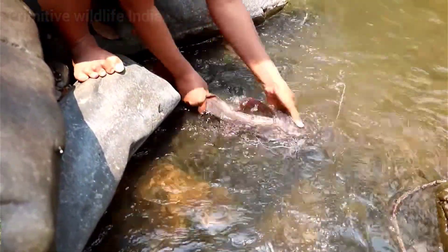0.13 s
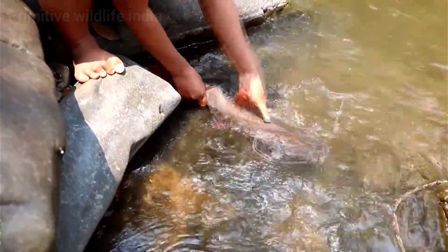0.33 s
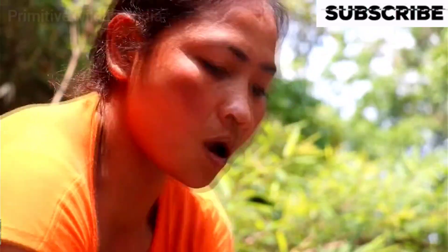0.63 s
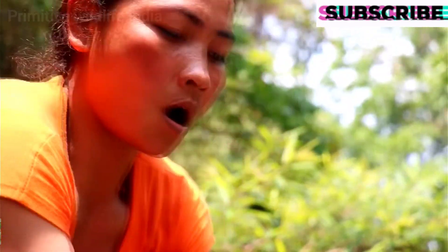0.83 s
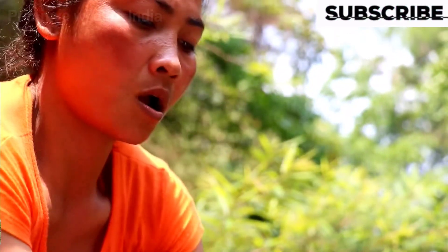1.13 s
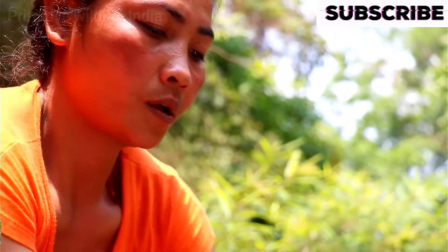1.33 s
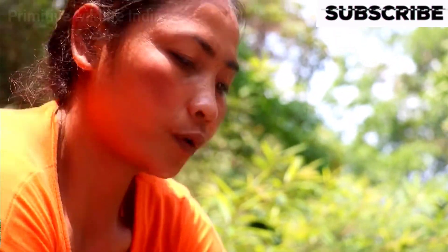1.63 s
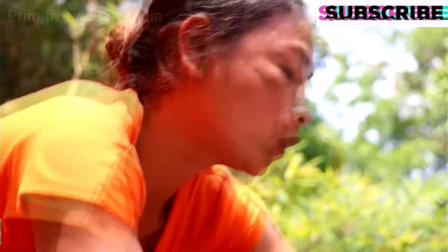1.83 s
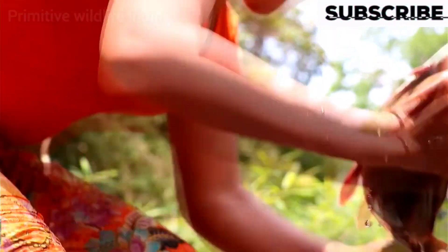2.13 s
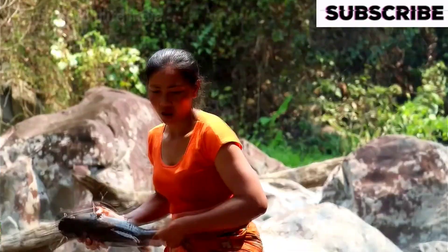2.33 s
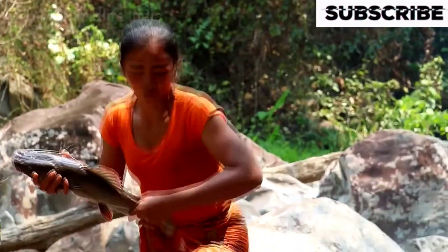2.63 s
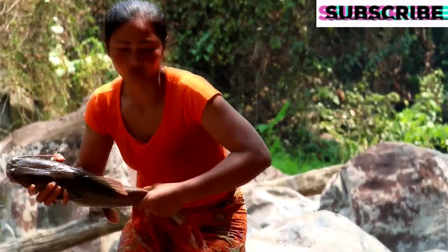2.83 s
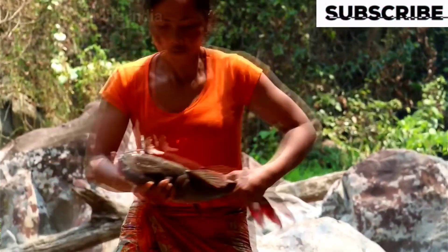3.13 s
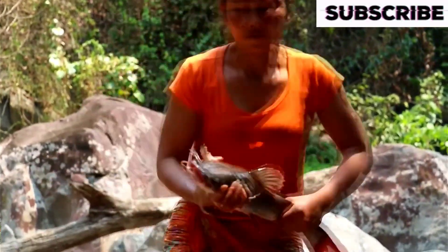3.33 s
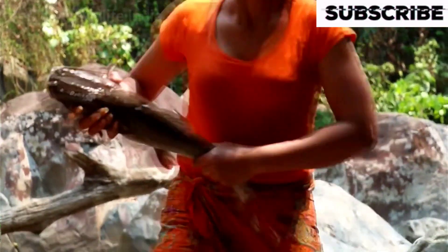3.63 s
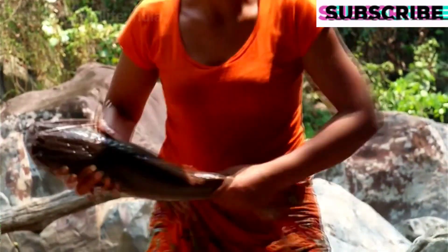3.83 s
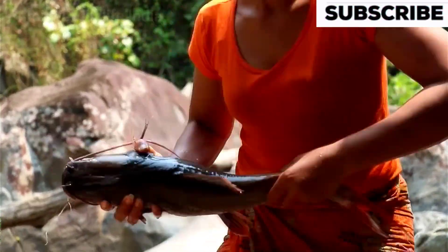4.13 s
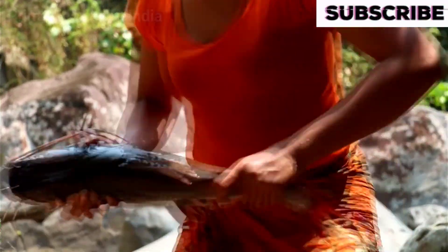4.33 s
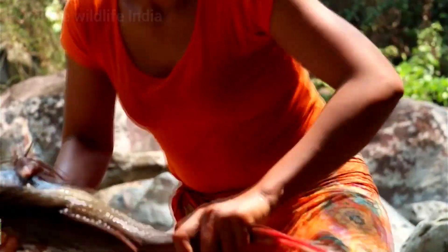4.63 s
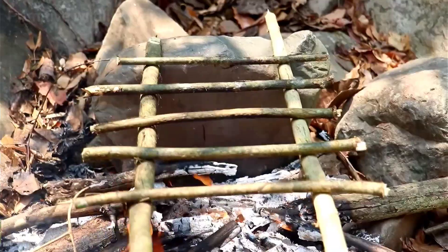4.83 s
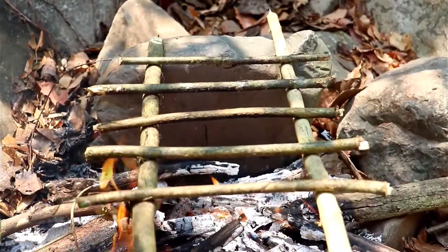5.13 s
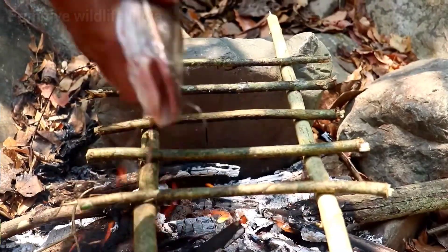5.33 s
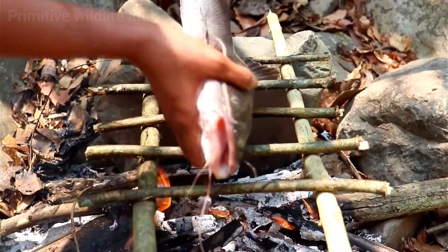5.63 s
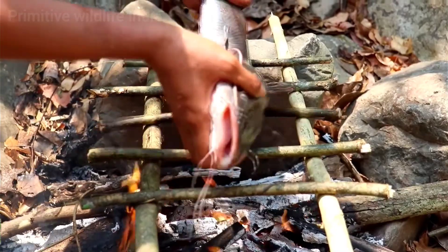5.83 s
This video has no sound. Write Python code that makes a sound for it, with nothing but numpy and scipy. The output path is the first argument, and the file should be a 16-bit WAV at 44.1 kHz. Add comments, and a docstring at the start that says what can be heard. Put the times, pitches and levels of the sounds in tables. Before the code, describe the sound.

Hands slosh a fish in shallow water, then close tinny dripping gives way to a thin distant river hiss with light rustles.

```python
"""A shallow rocky river, heard in four short stretches over a faint hush.
First, hands slosh a fish through the water: slaps, spray and resonating air bubbles, with faint birds.
From 0.5 s water trickles and drips with a tinny ring near 3 kHz.
From 2.1 s the river is farther off, its countless splashes merged into a thin hiss. Handling rustles
over it, one knock sounds at 3 s, and faint high bird whistles return toward the end."""
import sys
import numpy as np
from scipy import signal
from scipy.fft import rfft, irfft
from scipy.io import wavfile
from scipy.ndimage import uniform_filter1d

SR = 44100
rng = np.random.default_rng(int(sys.argv[2]) if len(sys.argv) > 2 else 0)


def bounce(signal):
    """Save signal as a 16-bit WAV file at the path given by the first command-line argument."""
    frames = np.transpose(np.atleast_2d(signal))
    limited = np.clip(frames, -1, 1)
    pcm = np.round(limited * 32767).astype(np.int16)
    wavfile.write(sys.argv[1], SR, pcm)


N = 263277
TIME = np.arange(N) / SR

# stretches of the scene: start_s, end_s
STRETCHES = [(0, .4795), (.502, 2.063), (2.097, 4.506), (4.552, 6)]
# spectral envelopes of the sources: frequency_hz, relative_db
HUSH_SPECTRUM = [(25, 17.5), (60, 1), (150, -3), (240, 1.5), (400, -1), (1000, 4), (2500, 3), (6000, 0.5),
                 (9000, 0), (12000, -31), (16000, -38)]
RIVER_SPECTRUM = [(400, -45.5), (950, -31.5), (1400, -18.5), (1750, -14), (2400, -7.5), (2800, -1),
                  (3200, 0), (3650, -6.5), (5300, -13), (6400, -13), (8000, -21.5), (9600, -16.5),
                  (12500, -31), (15800, -32)]
RUSTLE_SPECTRUM = [(600, -43), (1300, -19), (2000, -11), (2400, -4), (2750, 5), (3300, 3), (3800, -5.5),
                   (4400, -5.5), (6300, -13.5), (8500, -18.5), (12000, -27), (15800, -36)]
KNOCK_SPECTRUM = [(150, -39), (350, -18), (600, 1.5), (1200, 5), (2000, 0), (3000, 9), (4200, -8),
                  (8000, -26), (15000, -38)]
SLOSH_SPECTRUM = [(50, -17), (110, -12.5), (200, -3), (320, -13.5), (440, -3), (600, -5), (880, -2),
                  (1500, -6.5), (2300, -13), (4200, -13), (6000, -20.5), (7800, -25.5), (9500, -23),
                  (15500, -40)]
TRICKLE_SPECTRUM = [(300, -36.5), (700, -22), (1100, -20), (1800, -13), (2400, -8.5), (2850, 5),
                    (3250, 0.5), (3800, -10.5), (4900, -15), (6200, -21), (7800, -24), (10000, -21),
                    (12500, -34), (15800, -45)]
DROP_SPECTRUM = [(400, -36), (1100, -24.5), (1800, -8.5), (2400, -10.5), (2900, 7.5), (3400, 3),
                 (3900, -4.5), (4900, -10.5), (6200, -16.5), (8000, -29), (11000, -32.5), (15800, -42)]
# bird whistles: start_s, length_s, start_hz, end_hz, level_db
BIRD_WHISTLES = [(0.048, 0.055, 4370, 4770, -42), (.174, .11, 7930, 5970, -46.5),
                 (0.258, 0.14, 6340, 4820, -38.5), (0.416, 0.3, 7400, 7150, -53),
                 (1.952, .19, 8000, 8000, -57), (3.415, .04, 4900, 5400, -41),
                 (5.205, 0.49, 7220, 7400, -54), (5.696, 0.1, 7500, 8050, -44)]
# the river's hiss in the second, third and fourth stretch: relative_db
HISS_LEVELS = [-36, -38.5, -38]
# narrow-band swells of the hiss: start_s, length_s, relative_db, centre_hz
HISS_SWELLS = [(2.24, .36, -34.5, 3125), (3.098, 0.2, -43.5, 3320), (4.839, 0.32, -38.5, 2997),
               (5.512, 0.038, -35.5, 3320), (5.762, 0.1, -38, 3400)]
# rustles of hands, cloth and leaves: start_s, length_s, level_db, tilt_db_per_octave
HANDLING_RUSTLES = [(2.708, 0.032, -25, 1), (2.999, 0.017, -26.5, -3.5), (3.413, 0.044, -31.5, -3),
                    (3.457, 0.19, -42.5, -8), (3.765, 0.0074, -28.5, -3), (3.782, 0.059, -34, 6),
                    (3.86, 0.18, -34.5, 3.5), (4.026, 0.072, -32.5, 1), (4.193, 0.022, -36, 12.5),
                    (4.283, .14, -40, 0), (4.401, 0.013, -34.5, -3.5), (4.806, .014, -33, -2),
                    (4.877, 0.43, -35.5, 3), (5.448, 0.2, -46.5, 11)]
# one sharp knock and its duller rebounds: start_s, level_db, tilt_db_per_octave
KNOCK_IMPACTS = [(3.0349, -22, 0), (3.037, -28, -3), (3.0505, -38, -9)]
# how hard the hands stir the water: time_s, level_db
STIR_CURVE = [(0, -32.5), (.146, -30.5), (.2, -33.5), (.47, -27)]
# slaps of hands and fish on the water: start_s, peak_db, tilt_db_per_octave
WATER_SLAPS = [(.089, -38, 7), (0.106, -36, 7), (0.16, -26.5, 0.5), (0.2567, -27.5, 0.5), (0.301, -23.5, 2),
               (0.343, -25, 2), (0.451, -29.5, 5.5), (0.4767, -20.5, -3)]
# flow of the trickle, thinning and picking up again: time_s, level_db
FLOW_CURVE = [(.5, -27.5), (.7, -27), (.82, -34), (1.17, -27), (1.28, -32.5), (1.48, -28.5), (1.6, -31),
              (1.84, -37.5), (2.05, -29)]
# distinct bubbles, from low plops to small high pings: start_s, level_db, pitch_hz, rise_octaves_per_s
SINGLE_BUBBLES = [(.038, -11, 474, -3), (.064, -15, 710, -1), (.095, -21.5, 830, 14), (.128, -18, 850, 13),
                  (.146, -14.5, 887, 2), (.204, -22, 4540, 3), (.252, -22, 1350, 7), (0.2557, -21, 4680, 0),
                  (.344, -19, 640, 7), (.362, -17, 694, 2), (.382, -18.5, 452, 2), (0.426, -17, 1090, 6),
                  (.443, -13.5, 393, -4.5), (.548, -31, 640, -2), (1.07, -31, 728, 0.5),
                  (1.161, -11, 4540, 13), (1.299, -15.5, 4930, 1), (1.322, -11, 4880, -2),
                  (1.327, -36.5, 450, 31), (1.336, -29.5, 1045, 26), (1.439, -14.5, 4610, 8),
                  (1.456, -25.5, 1354, 19), (1.523, -16, 4400, 10), (1.541, -15.5, 4000, 13),
                  (1.464, -21, 2090, 24), (1.631, -27, 1690, -14), (1.938, -38, 730, 7),
                  (1.958, -34, 1110, 23)]
# heavy drops striking the water: start_s, peak_db, ring_t60_s, tilt_db_per_octave
HEAVY_DROPS = [(0.506, -27, .011, -4), (.5166, -18.5, .009, -9), (.5651, -18.5, 0.008, -6),
               (.571, -20, 0.0027, 5), (.756, -19, .008, -1), (0.8422, -19.5, 0.017, 2.5),
               (0.8763, -13, .016, -3), (0.9353, -16.5, 0.03, 4.5), (0.9766, -10.5, 0.0091, 5.5),
               (.98, -11, 0.02, 0.5), (1.032, -23.5, 0.013, 3), (1.1567, -10, 0.009, 10),
               (1.2421, -9, 0.0076, 5), (1.29, -21, 0.0095, 7), (1.32, -15.5, 0.0034, 11.5),
               (1.3574, -17.5, 0.0049, 4), (1.439, -12.5, 0.0057, 4), (1.47, -27, .0095, -4),
               (1.524, -18.5, 0.02, 7.5), (1.542, -16.5, 0.019, 2.5), (1.6811, -18.5, 0.0061, -3.5),
               (2.059, -24, .008, 5.5)]


def amp(db):
    """Amplitude ratio of a level in decibels."""
    return 10 ** (np.asarray(db) / 20)


def unit(x):
    """Normalisation to rms 1."""
    return x / np.sqrt(np.mean(x ** 2) + 1e-20)


def crest(x):
    """Normalisation of the loudest 3 ms to rms 1."""
    return x / np.sqrt(uniform_filter1d(x ** 2, size=132, mode="constant").max() + 1e-20)


def level(curve):
    """Amplitude envelope interpolated from rows of time_s, level_db."""
    return amp(np.interp(TIME, *np.transpose(curve)))


def gate(index):
    """Time window of one stretch, with 2 ms edges."""
    start, end = STRETCHES[index]
    return uniform_filter1d(1. * ((TIME >= start) & (TIME < end)), size=90)


def add(mix, start_s, sound):
    """Superposition: a sound adds to the mix from start_s on."""
    part = mix[max(round(start_s * SR), 0):][:len(sound)]
    part += sound[:len(part)]


def colour(x, spectrum, tilt_db=0, size=2048):
    """Minimum-phase filtering by a spectral envelope, tilted by tilt_db per octave up to 8 kHz."""
    octave = np.log2(abs(np.fft.fftfreq(size, 1 / SR)) + 1)
    hz, db = np.transpose(spectrum)
    db = np.interp(octave, np.log2(hz), db) + tilt_db * np.minimum(octave, np.log2(8000))
    db -= 12 * np.maximum(np.log2(hz[0]) - octave, 0)  # the bass falls away below the first point
    log_gain = np.log(amp(np.maximum(db - db.max(), -90)))
    taps = np.fft.ifft(np.exp(np.conj(signal.hilbert(log_gain)))).real
    return signal.fftconvolve(x, taps[:size // 2])[:len(x)]


def wander(count, rate_hz):
    """Low-pass Gaussian noise: a smooth random fluctuation of rms 1."""
    lowpass = np.exp(-(np.fft.rfftfreq(count, 1 / SR) / rate_hz) ** 2)
    return unit(irfft(rfft(rng.standard_normal(count)) * lowpass, count))


def patchy_noise(depth_db, size=512):
    """Noise whose narrow bands swell and sink under random amplitude modulation."""
    bands = signal.stft(rng.standard_normal(N), nperseg=size)[2]
    field = uniform_filter1d(rng.standard_normal(bands.shape), size=4, axis=0)
    field = uniform_filter1d(field, size=6, axis=1)
    return signal.istft(bands * amp(depth_db * unit(field)), nperseg=size)[1][:N]


def blurred_tone(length_s, start_hz, end_hz, width_hz):
    """Random modulation spreads a gliding tone into a narrow band."""
    count = int(length_s * SR)
    blur = wander(count, width_hz / 2) + 1j * wander(count, width_hz / 2)
    phase = 2 * np.pi * np.cumsum(np.geomspace(start_hz, end_hz, count)) / SR
    return (blur * np.exp(1j * phase)).real * signal.windows.tukey(count, .5)


def patter(per_s, spread_db):
    """A Poisson process of clicks, most small and a few large."""
    size = amp(spread_db * np.minimum(rng.exponential(1, N), 3.5))
    return size * rng.choice([-1, 1], N) * (rng.random(N) < per_s / SR)


def ring(hz, t60_s, octaves_per_s):
    """A damped oscillation: a sine that decays exponentially while its pitch glides."""
    t = np.arange(int(max(t60_s, .002) * SR)) / SR
    phase = 2 * np.pi * np.cumsum(hz * 2 ** (octaves_per_s * t)) / SR
    onset = 1 - np.exp(-2 * hz * t)
    return np.sin(phase) * onset * np.exp(-np.log(1000) * t / t60_s)


def froth(per_s, spread_db, low_hz, high_hz, cycles, climb_octaves, sizes=36):
    """Randomly excited bubbles of equal Q, each climbing in pitch as it nears the surface."""
    out = np.zeros(N)
    for hz in np.geomspace(low_hz, high_hz, sizes):
        t60_s = cycles / hz
        bubble = ring(hz, t60_s, climb_octaves / t60_s)
        out += hz * signal.oaconvolve(patter(per_s / sizes, spread_db), bubble)[:N]
    return unit(out)


def splat(spectrum, tilt_db, spatter_db, spatter_s, count=2048):
    """An impact on water: an impulse, then exponentially decaying spatter."""
    impact = amp(spatter_db) * rng.standard_normal(count) * np.exp(-np.arange(count) / SR / spatter_s)
    impact[0] += 1
    return crest(colour(impact, spectrum, tilt_db))


def hush():
    """Stationary broadband noise forms a faint floor."""
    return amp(-53) * unit(colour(rng.standard_normal(N), HUSH_SPECTRUM, size=8192))


def birds(steady_width_hz=400, glide_share=0.54):
    """Forest echoes blur each whistle into a band: the larger the glide, the wider the band."""
    out = np.zeros(N)
    for start_s, length_s, start_hz, end_hz, db in BIRD_WHISTLES:
        width_hz = steady_width_hz + glide_share * abs(end_hz - start_hz)
        add(out, start_s, amp(db) * blurred_tone(length_s, start_hz, end_hz, width_hz))
    return out


def river(swell_rise=0.09):
    """Far splashes and bubbles sum incoherently to a hiss, which now and then swells near 3 kHz."""
    babble = froth(per_s=900, spread_db=3, low_hz=1207, high_hz=9060, cycles=55, climb_octaves=0.063)
    hiss = patchy_noise(depth_db=2.13) + amp(-8.5) * babble
    gain = sum(amp(db) * gate(index) for index, db in enumerate(HISS_LEVELS, start=1))
    flicker = amp(0.1 * wander(N, rate_hz=37))
    out = gain * flicker * unit(colour(hiss, RIVER_SPECTRUM))
    for start_s, length_s, db, hz in HISS_SWELLS:
        swell = blurred_tone(length_s, hz * (1 - swell_rise / 2), hz * (1 + swell_rise / 2), width_hz=880)
        add(out, start_s, amp(db) * swell)
    return out


def rustles(attack_share=0.064, fade_share=0.52, top_hz=13500):
    """Friction of hands, cloth and leaves gives grainy noise that swells quickly and fades."""
    out = np.zeros(N)
    grain = patchy_noise(depth_db=1) + amp(-6) * unit(patter(per_s=2000, spread_db=3.5))
    lowpass = signal.butter(10, top_hz, fs=SR, output="sos")
    for start_s, length_s, db, tilt_db in HANDLING_RUSTLES:
        count = int(length_s * SR)
        progress = np.linspace(0, 1, count)
        envelope = np.clip(np.minimum(progress / attack_share, (1 - progress) / fade_share), 0, 1)
        scrape = np.roll(grain, -int(start_s * SR))[:count] * envelope
        rustle = colour(np.pad(scrape, (0, SR // 100)), RUSTLE_SPECTRUM, tilt_db)
        rustle = signal.sosfilt(lowpass, rustle)
        add(out, start_s, amp(db) * rustle / np.sqrt(np.sum(rustle ** 2) / count))
    return out


def knock():
    """The impulse response of a hard knock, repeated weaker and duller at each rebound."""
    out = np.zeros(N)
    for start_s, db, tilt_db in KNOCK_IMPACTS:
        response = colour(signal.unit_impulse(SR // 20), KNOCK_SPECTRUM, tilt_db)
        add(out, start_s, amp(db) * crest(response))
    return out


def slosh():
    """Air entrainment: hands churn the shallows into ringing bubbles, with spray and a few slaps."""
    swarm = froth(per_s=1200, spread_db=4.5, low_hz=222.7, high_hz=3810, cycles=39, climb_octaves=0.19)
    spray = unit(patter(per_s=2500, spread_db=2))
    out = level(STIR_CURVE) * unit(colour(swarm + amp(7.5) * spray, SLOSH_SPECTRUM))
    for start_s, db, tilt_db in WATER_SLAPS:
        add(out, start_s, amp(db) * splat(SLOSH_SPECTRUM, tilt_db, spatter_db=-10, spatter_s=0.0049))
    return out


def trickle():
    """A thin stream falling on water radiates by impact and bubble resonance: ticks, fizz, gurgles."""
    fizz = froth(per_s=880, spread_db=2.5, low_hz=1714, high_hz=8680, cycles=85, climb_octaves=0.073)
    ticks = amp(-0.5) * unit(patter(per_s=800, spread_db=1))
    splashes = unit(colour(ticks + fizz, TRICKLE_SPECTRUM))
    gurgles = froth(per_s=140, spread_db=0, low_hz=335.5, high_hz=2236, cycles=56, climb_octaves=0.51)
    gurgles = unit(colour(gurgles, TRICKLE_SPECTRUM))
    return level(FLOW_CURVE) * (splashes + amp(-11) * gurgles)


def bubbles(t60_at_1khz_s=0.038, damping_power=0.53):
    """Distinct bubbles resonate, from low plops to pings: the smaller, the higher and shorter."""
    out = np.zeros(N)
    for start_s, db, hz, octaves_per_s in SINGLE_BUBBLES:
        t60_s = t60_at_1khz_s * (1000 / hz) ** damping_power
        add(out, start_s, amp(db) * ring(hz, t60_s, octaves_per_s))
    return out


def drops(heaviest_hz=3380, octaves_per_db=0.0139, splat_db_per_db=0.62, max_lag_s=0.0029):
    """Each impact excites a tinny damped ring near 3 kHz; lighter drops splat softer and ring lower."""
    out = np.zeros(N)
    heaviest_db = max(row[1] for row in HEAVY_DROPS)
    for start_s, db, t60_s, tilt_db in HEAVY_DROPS:
        detune, lag = rng.random(2)
        weight_db = db - heaviest_db
        hz = heaviest_hz * 2 ** (octaves_per_db * weight_db)
        drop = splat(DROP_SPECTRUM, tilt_db, spatter_db=-12, spatter_s=0.0037)
        drop *= amp(splat_db_per_db * weight_db + 3.5)
        add(drop, 0, crest(ring(hz, t60_s, octaves_per_s=2.3)))
        upper_ring = crest(ring(hz * (1.49 + .5 * detune), t60_s, octaves_per_s=7.2))
        add(drop, max_lag_s * lag, amp(tilt_db - 20.5) * upper_ring)
        add(out, start_s, amp(db) * crest(drop))
    return out


def scene():
    """Superposition of all sources in mono; the hiss dips briefly after the knock."""
    floor = hush()
    sloshing, dripping = gate(0), gate(1)
    water = sloshing * slosh() + dripping * (trickle() + drops()) + (sloshing + dripping) * bubbles()
    hiss_gain = level([(3.03, 2.5), (3.042, -2), (3.07, -4), (3.095, 1)])
    return (floor + hiss_gain * river() + rustles() + knock() + birds() + water)[None]


def record(dry, ceiling=1.6, cutoff_hz=15950):
    """Soft saturation rounds off the loudest drops; a low-pass filter then limits the bandwidth."""
    rounded = ceiling * np.tanh(dry / ceiling)
    lowpass = signal.firwin(511, cutoff_hz, window=("kaiser", 9), fs=SR)
    return signal.oaconvolve(rounded, lowpass[None], "same")


dry = scene()
out = record(dry)
bounce(out)
```